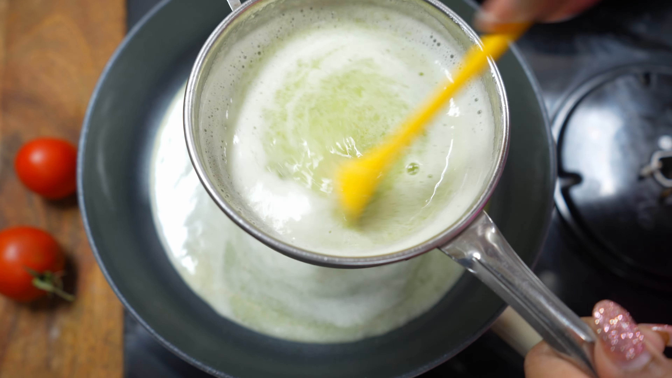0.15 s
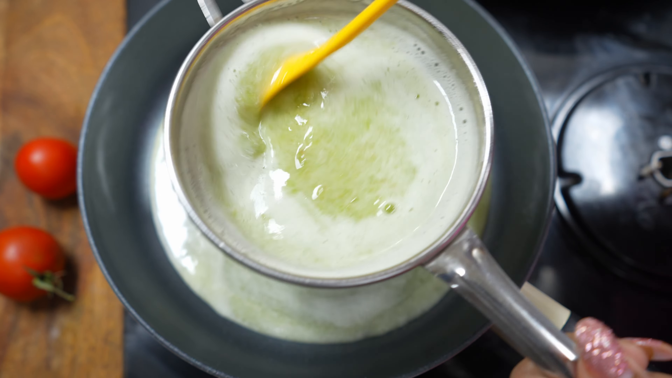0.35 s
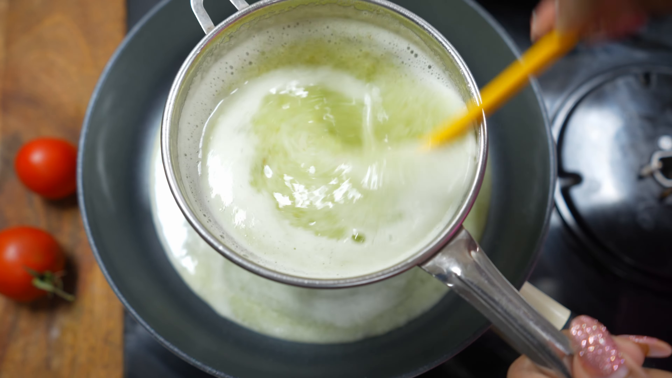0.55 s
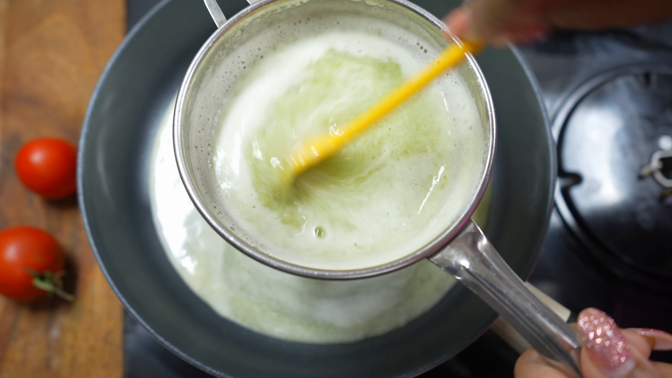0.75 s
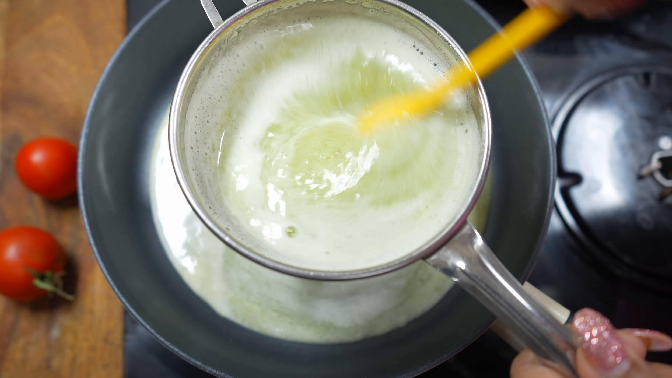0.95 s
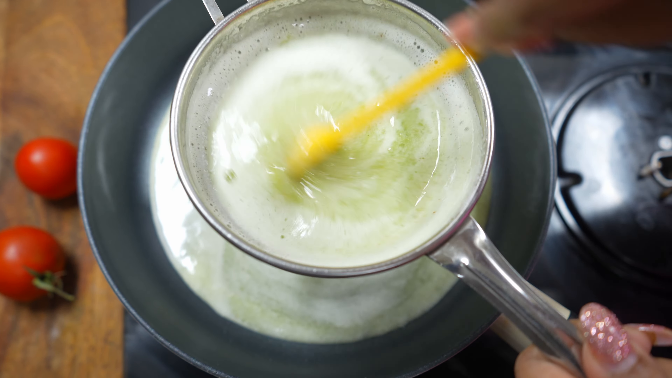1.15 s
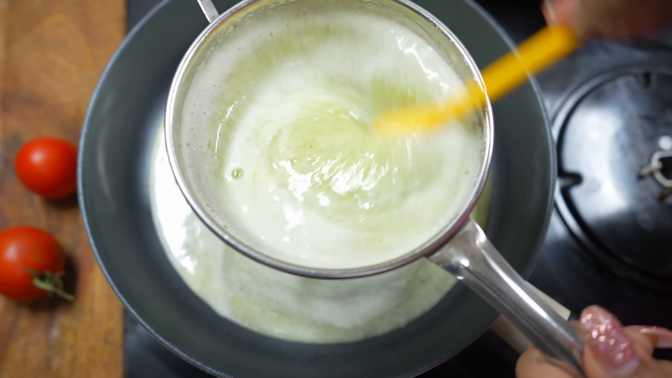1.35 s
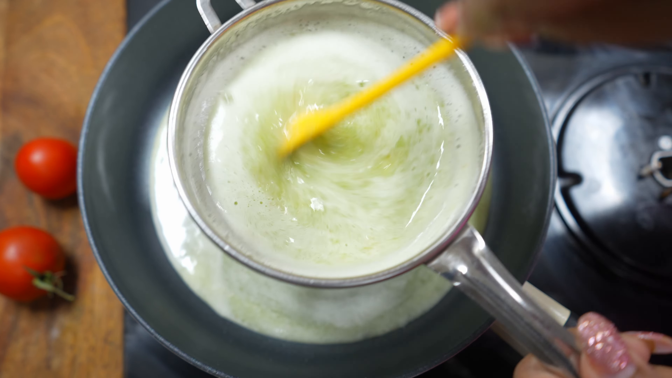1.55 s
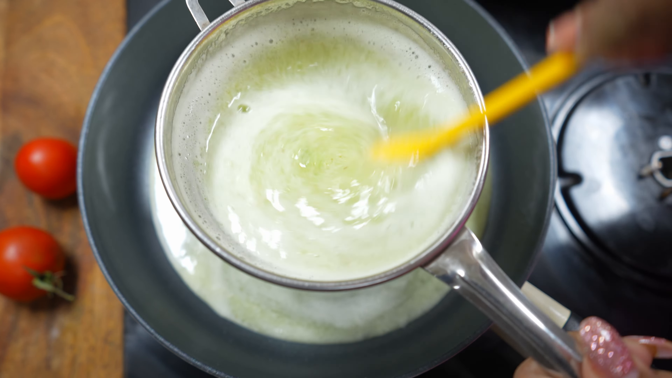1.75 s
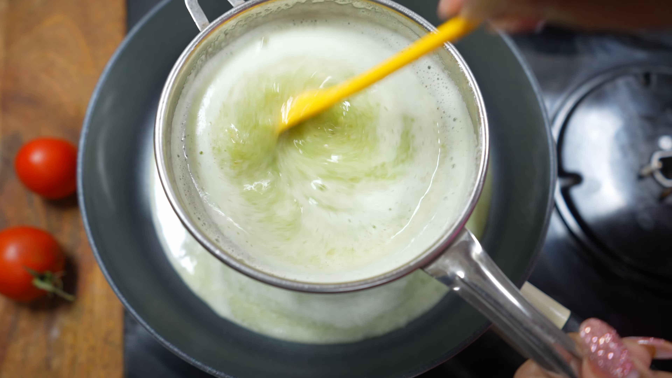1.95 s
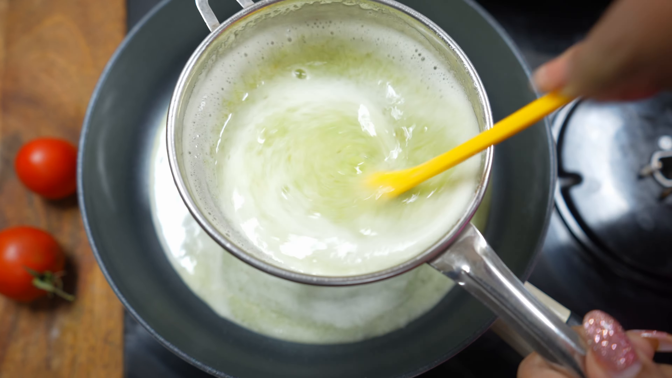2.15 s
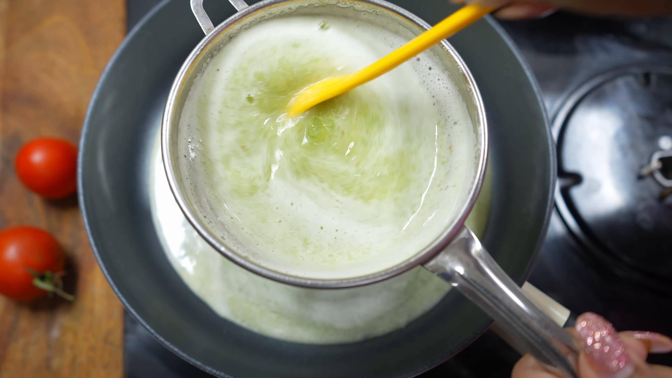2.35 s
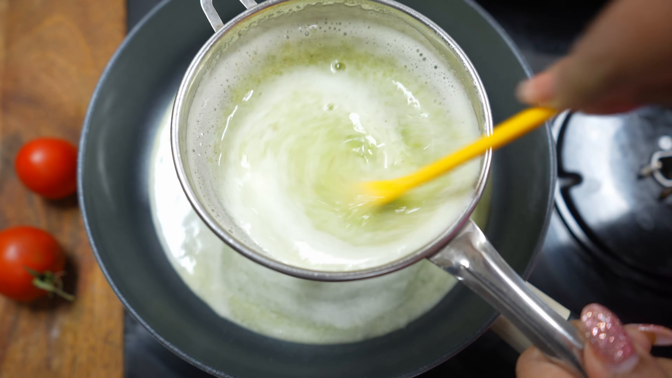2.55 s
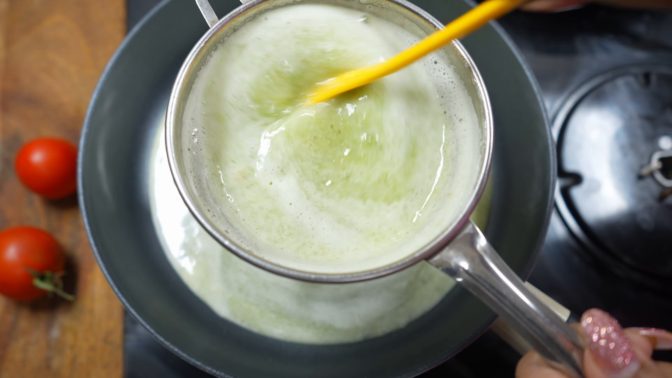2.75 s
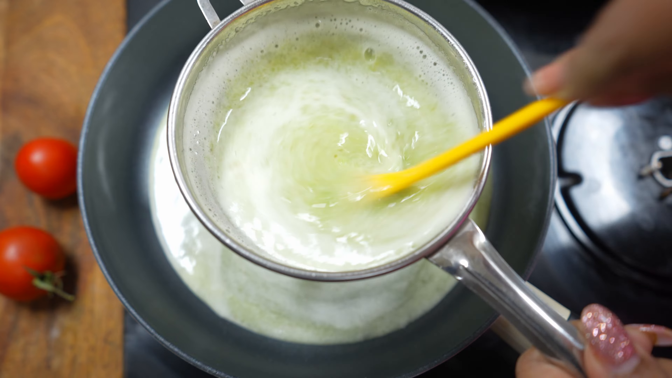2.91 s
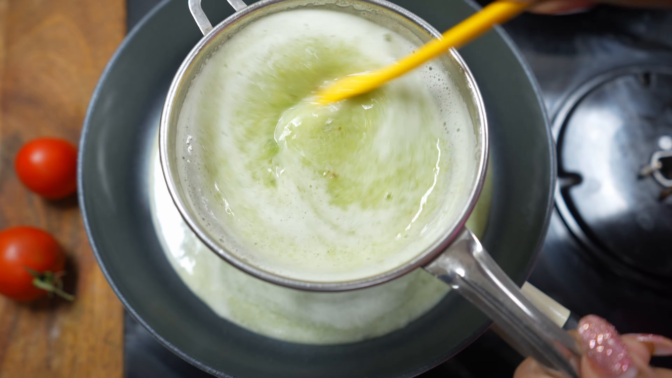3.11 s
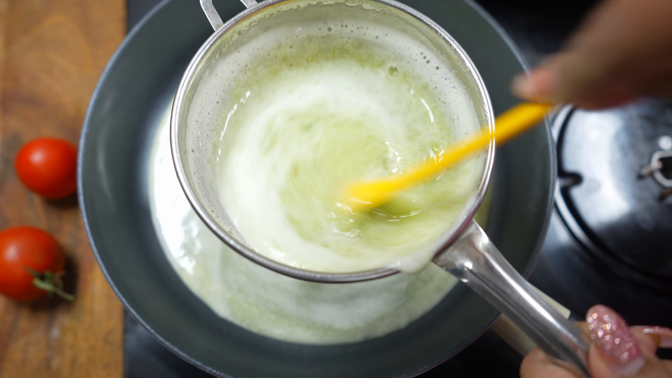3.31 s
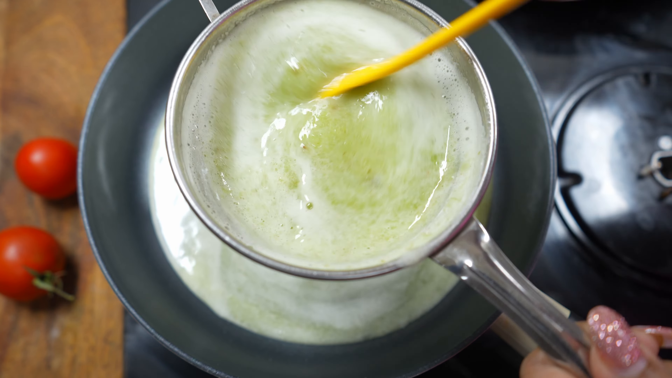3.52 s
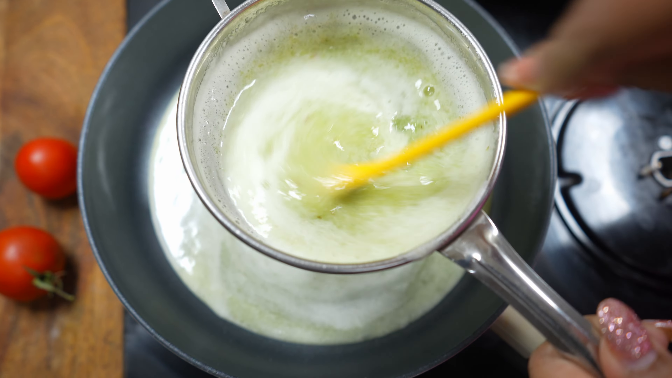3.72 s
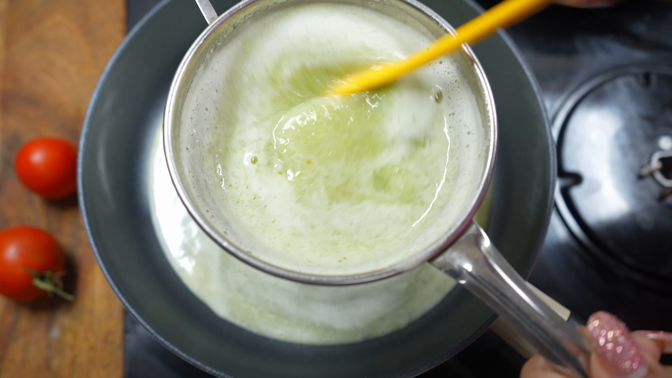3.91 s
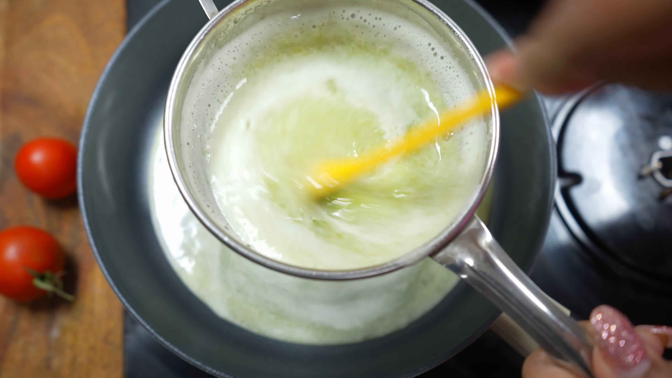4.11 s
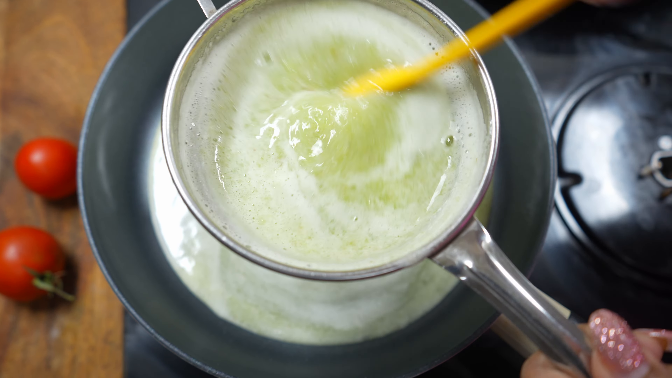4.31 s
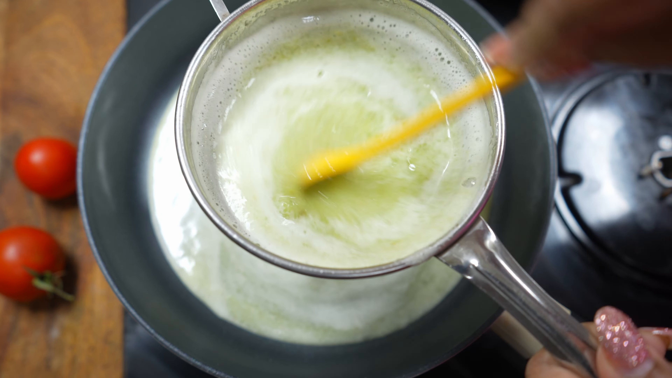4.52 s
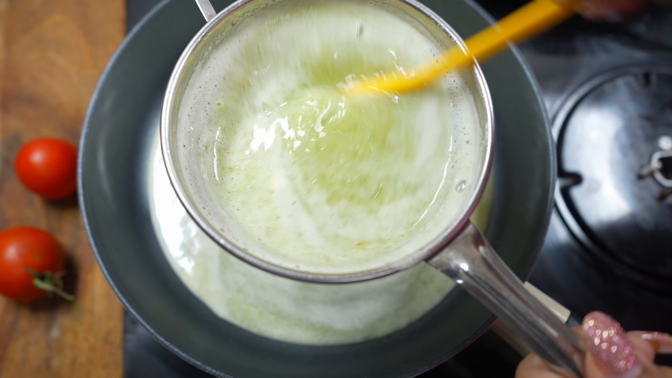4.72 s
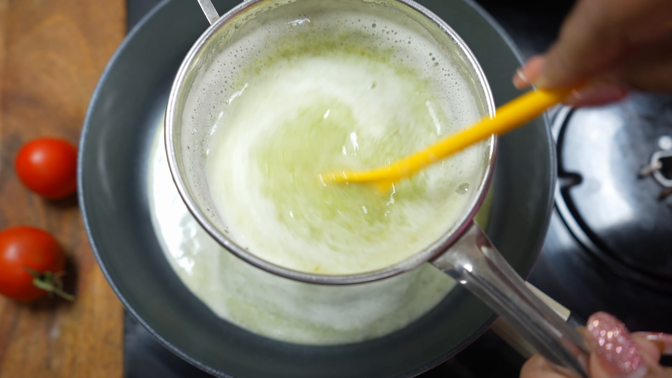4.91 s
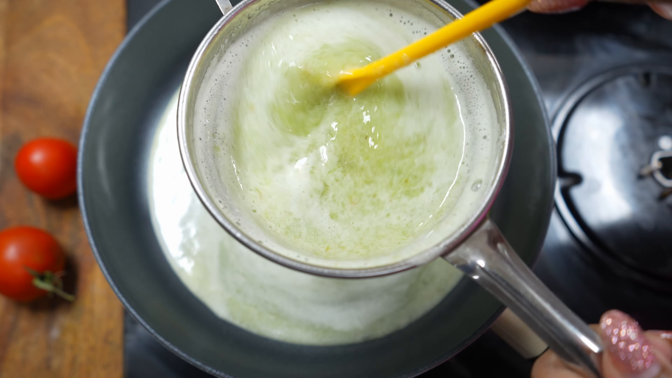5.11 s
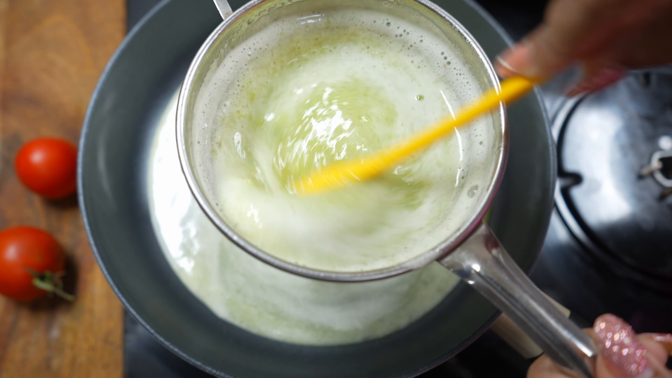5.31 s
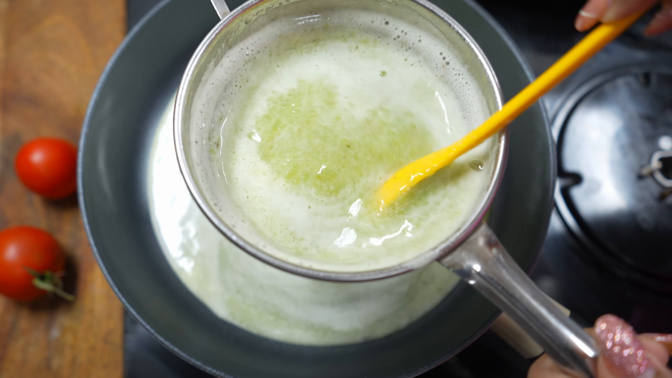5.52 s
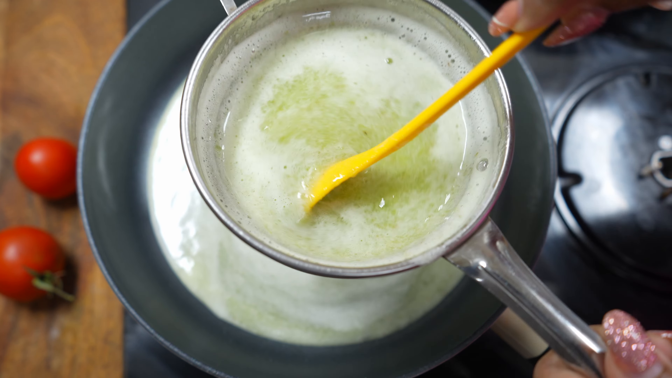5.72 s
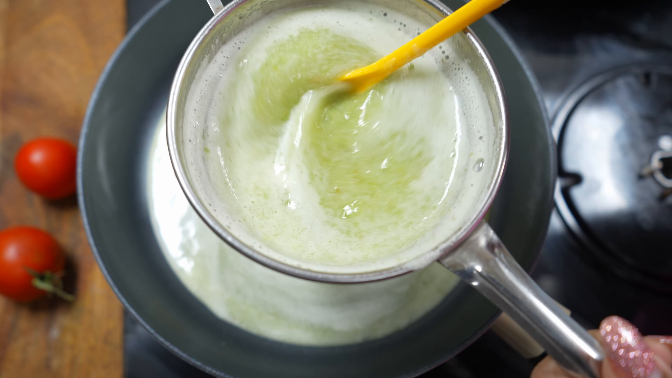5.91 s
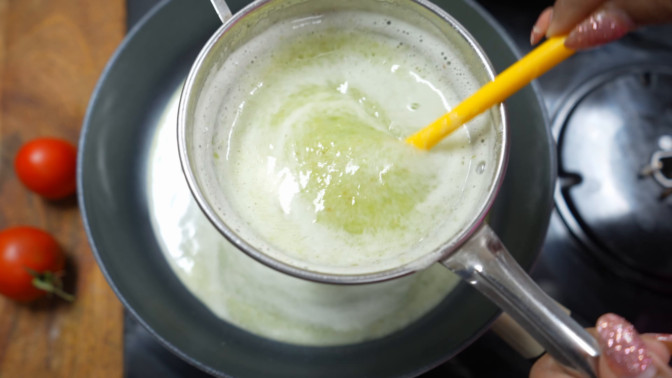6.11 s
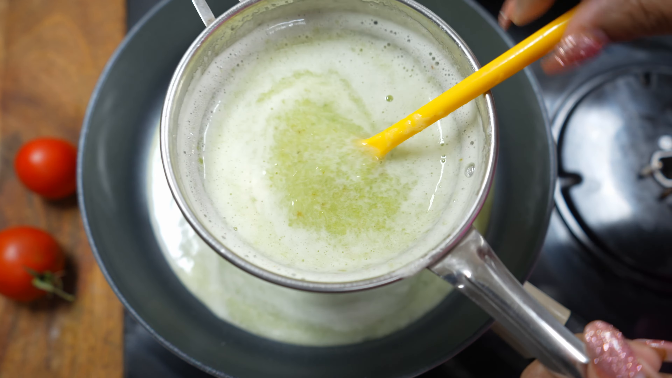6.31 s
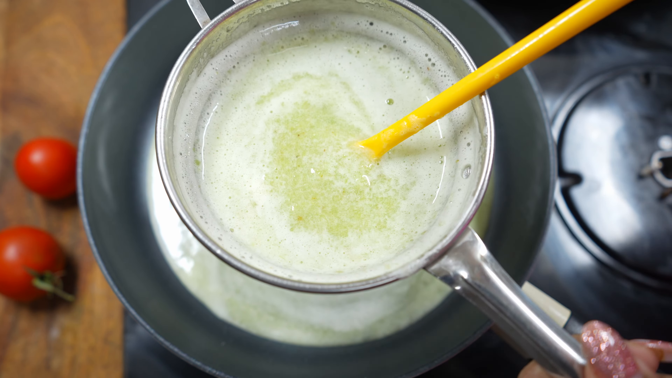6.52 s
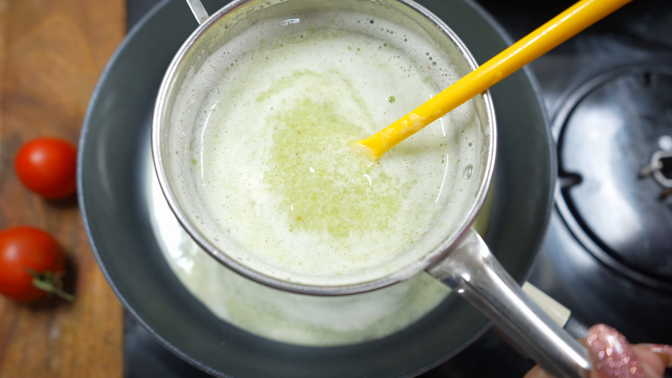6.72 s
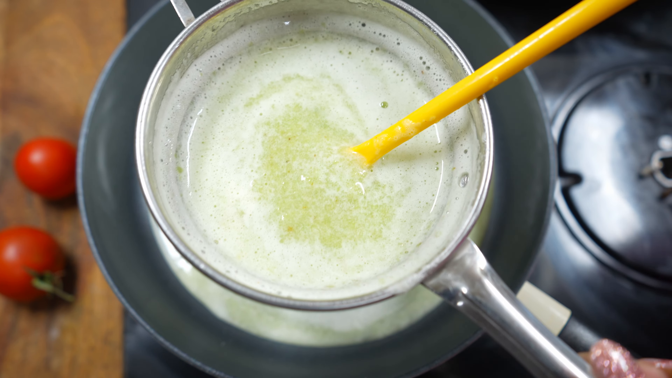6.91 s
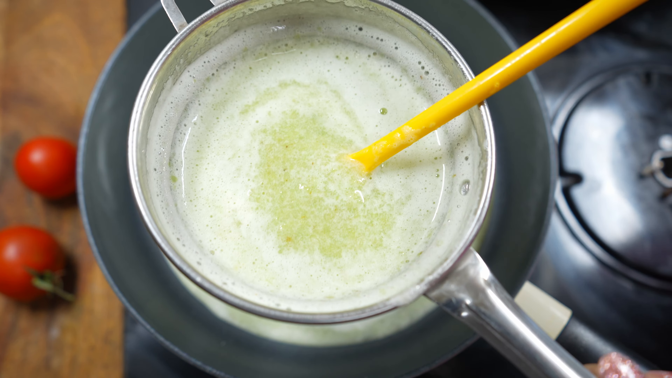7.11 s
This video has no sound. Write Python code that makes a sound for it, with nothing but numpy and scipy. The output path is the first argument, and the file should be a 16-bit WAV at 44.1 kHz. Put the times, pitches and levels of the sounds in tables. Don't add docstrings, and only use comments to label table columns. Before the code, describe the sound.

Close wet scraping swirls round a wire sieve with steel ticks and hollow bowl resonance, ending in a clack, soft shifting and small plinks.

```python
import sys
import numpy as np
from scipy import signal
from scipy.io import wavfile
from scipy.ndimage import uniform_filter1d, minimum_filter1d

SR = 44100
rng = np.random.default_rng(int(sys.argv[2]) if len(sys.argv) > 2 else 0)


def wav_out(sig):
    wavfile.write(sys.argv[1], SR, np.round(np.clip(np.atleast_2d(sig).T, -1, 1) * 32767).astype(np.int16))


def makeup_ratio(level_db):
    decades = np.asarray(level_db, float) / 20
    return 10 ** decades


N = 319900
T = np.arange(N) / SR

RIM_HZ = [830, 1087, 1870, 2132, 2340, 2552, 2760, 2980, 3280, 3950, 4240, 4600, 4810, 5400, 5700, 6380,
          6870, 7080, 7270, 8630]


def evened(x):
    return x / np.sqrt(np.mean(x ** 2) + 1e-20)


def read(points, hz):
    point_hz, value = np.transpose(points)
    return np.interp(np.log(hz + 1), np.log(point_hz + 1), value)


def wander(rate_hz):
    knots = uniform_filter1d(rng.standard_normal(2000), size=3)
    knots = knots - uniform_filter1d(knots, size=15)
    return np.interp(T * rate_hz * 3, np.arange(2000), evened(knots))


def ring(x, hz, width_hz):
    r = np.exp(-np.pi * width_hz / SR)
    angle = 2 * np.pi * hz / SR
    return signal.lfilter([1 - r * r], [1, -2 * r * np.cos(angle), r * r], x) * np.sin(angle)


def colour(x, points):
    gain_db = read(points, abs(np.fft.fftfreq(4096, 1 / SR)))
    log_gain = np.log(makeup_ratio(np.maximum(gain_db, -90)))
    taps = np.fft.ifft(np.exp(np.conj(signal.hilbert(log_gain)))).real[:2048]
    return signal.oaconvolve(x, taps)[:N]


def slips(per_s, spread_db, clump_db, clump_hz):
    size = makeup_ratio(spread_db * np.minimum(rng.exponential(1, N), 4)) * rng.choice([-1., 1.], N)
    happens = rng.random(N) < per_s / SR
    return evened(size * happens * makeup_ratio(clump_db * wander(clump_hz)))


def stroke(start_s, length_s, fall_db_per_s):
    rise_s, arch_db, crest = 0.015, 4.5, 0.51
    u = (T - start_s) / length_s
    shape_db = -arch_db * ((np.clip(u, 0, 1) - crest) * 2) ** 2
    fall_db = fall_db_per_s * np.maximum(u - 1, 0) * length_s
    return np.clip((T - start_s) / rise_s, 0, 1) ** 2 * makeup_ratio(shape_db - fall_db)


def push():
    # start_s, length_s, push_db, shallow_bowl_relative_db, wires_relative_db
    circles = [(0.704, 0.1, -20, 2, -24), (0.819, 0.15, -19, -3, -15.5), (0.917, 0.14, -14, -20.5, -23.5),
               (1.066, 0.26, -16.5, -2, -17.5), (1.352, 0.069, -13, -21, -20.5),
               (1.456, 0.14, -14.5, -1, -18), (1.69, 0.18, -13.5, -15, -22), (1.856, 0.11, -10, -2, -21.5),
               (1.997, 0.17, -16, -19.5, -23), (2.103, 0.15, -17, -3, -19.5),
               (2.25, 0.078, -12.5, 1.5, -17.5), (2.415, .12, -12, -14, -27), (2.589, .12, -13.5, 0.5, -19),
               (2.783, 0.17, -12, -4.5, -18), (2.981, 0.12, -17, 4, -14), (3.149, 0.051, -12.5, -3, -16),
               (3.279, 0.23, -20, 3, -11), (3.568, 0.15, -12.5, -7, -17.5), (3.713, .26, -19.5, 1, -15),
               (4.031, 0.1, -19, -20.5, -12), (4.09, 0.19, -17.5, 2, -16.5),
               (4.333, 0.14, -13.5, -5, -14.5), (4.485, 0.17, -18.5, 2, -13)]
    # start_s, length_s, push_db, shallow_bowl_relative_db, wires_relative_db
    swipes = [(-.04, 0.07, -14.5, -3, -20), (0.152, 0.07, -20.5, 6.5, -5.5), (.26, 0.096, -23, 1, -6),
              (0.389, 0.078, -35.5, -23, 1), (.525, 0.059, -9.5, -5, -15.5), (4.744, 0.12, -12.5, -4, -14),
              (4.98, 0.11, -26.5, 7.5, -38), (5.264, 0.046, -22, 3, -7.5), (5.308, 0.1, -12.5, -9, -22),
              (5.583, 0.12, -22, -1, -13.5), (5.631, 0.058, -17, 3, -15.5), (5.84, 0.023, -41, 2, -16),
              (5.918, 0.048, -52.5, 0, 24), (5.43, 0.034, -38, -9, 4.5), (6.05, 0.039, -31.5, -3, -3.5),
              (6.09, 0.026, -26.5, 9.5, -15)]
    # start_s, length_s
    contact_s = (.22, 4.53)
    # push_db, shallow_bowl_relative_db, wires_relative_db
    contact_db = (-27, 2.5, -9.5)
    wire_rise_s = 0.036
    wire_exponent = 0.84
    strokes = circles + swipes + [tuple(contact_s) + tuple(contact_db)]
    falls_db_per_s = [288] * len(circles) + [249] * (len(swipes) + 1)
    power = np.full((3, N), 1e-10)
    for (start_s, length_s, push_db, shallow_db, wire_db), fall in zip(strokes, falls_db_per_s):
        shape = stroke(start_s, length_s, fall) ** np.array([[1], [1], [wire_exponent]])
        shape[2] *= np.clip((T - start_s) / wire_rise_s, .15, 1)
        part_db = push_db + np.array([[0], [shallow_db], [wire_db]])
        power += (makeup_ratio(part_db) * shape) ** 2
    return 10 * np.log10(power)


def jolts():
    # start_s, peak_db, shallow_modes_relative_db
    catches = [(0.123, -5, -10), (0.15, 3.5, -3), (0.161, -3, 4.5), (0.276, -19, 20), (0.538, 2, -25),
               (0.754, -4, -7), (1.015, 0, -16), (1.091, -1, 1), (1.371, -4, -6.5), (1.461, 1.5, -23),
               (1.708, -5.5, -11), (4.961, -9, 9), (2.113, 4, -17), (5.232, -14.5, -3), (2.626, -9, -10),
               (3.313, -28, 8), (3.358, 3, -16), (3.587, 0, 1.5), (4.006, -7, -37), (4.05, 5.5, 0.5),
               (4.398, -23, -12), (4.773, 3, -13), (4.991, -14, 20.5), (5.078, -17, -4), (5.253, -14.5, -7),
               (5.59, -11, -7), (5.851, -28, -3), (5.936, -25.5, 25.5), (6.049, -10, 2.5),
               (6.098, -11, 6.5)]
    out, t = np.zeros((2, N + SR)), np.arange(SR // 4) / SR
    shape = np.exp(-t / 0.02) * np.minimum(t / 0.0018, 1)
    for start_s, peak_db, shallow_db in catches:
        both_db = [[peak_db - 17.5], [peak_db + shallow_db - 19.5]]
        out[:, round(start_s * SR):][:, :len(t)] += makeup_ratio(both_db) * shape
    return out[:, :N]


def pops():
    t = np.arange(SR // 50) / SR
    burst = rng.standard_normal(len(t)) * np.exp(-t / .002)
    bursts = slips(per_s=35, spread_db=3, clump_db=0, clump_hz=9)
    return evened(signal.oaconvolve(bursts, burst)[:N])


def bowl(drive, level, modes_hz, modes, place_db):
    touched = [drive * makeup_ratio(db + place_db * wander(10)) for _, db in modes]
    steady = sum(ring(x, hz, width) for x, hz, (width, _) in zip(touched, modes_hz, modes))
    played = sum(ring(x * level, hz, width) for x, hz, (width, _) in zip(touched, modes_hz, modes))
    return played / np.sqrt(np.mean(steady ** 2))


def stirring(deep_db, shallow_db, rasp_db):
    deep_hz = [165, 277, 350, 415, 445, 509, 563, 600, 662, 700]
    # width_hz, level_db
    deep_modes = [(40, -1), (20, 9.5), (23.148, 9), (32, 6.5), (25, 8), (21.8, 8.5), (25, 14), (30, 2.5),
                  (29.2, 9.5), (26.3, 5.5)]
    shallow_hz = [758, 832, 902, 961, 1032, 1070, 1165, 1287, 1379, 1440, 1604]
    # width_hz, level_db
    shallow_modes = [(19, -6), (24.074, -3.5), (23.76, -9.5), (23.148, -3), (26.2, 5), (25.6, -11),
                     (32.407, -5), (27.6, -3), (22.4, -9), (32.4, -66), (19.8, -50)]
    # frequency_hz, level_db
    rasp_colour = [(700, -23.5), (1100, 6.5), (1500, -13), (2000, -3), (3000, -2.5), (4800, -5.5),
                   (5300, -16), (7500, -22), (11000, -72)]
    # frequency_hz, level_db
    fizz_colour = [(3500, -23), (5200, -2), (6800, -3.5), (7600, -9.5), (9500, -13.5), (12000, -17),
                   (14300, -18), (16000, -43)]
    fizz_db = -47.5 + 1.0 * (rasp_db + 32.5)
    moving = np.clip((6.3 - T) / 0.027, 0, 1)
    deep_jolt, shallow_jolt = jolts()
    heavy = slips(per_s=2000, spread_db=2.5, clump_db=1.0, clump_hz=34.43) * moving
    light = slips(per_s=9000, spread_db=5.0, clump_db=1.5, clump_hz=49.95) * moving
    finest = slips(per_s=12000, spread_db=3.5, clump_db=1.1, clump_hz=45) * moving
    patches = sum(ring(finest * makeup_ratio(4 * wander(12)), hz, hz / 7) for hz in np.geomspace(5500, 14000, 8))
    finest = evened(finest + 1.6 * evened(patches))
    light = light * (0.11 + 0.75 * np.sqrt(abs(uniform_filter1d(heavy ** 2, size=400))))
    blooms = evened(sum(ring(light * makeup_ratio(5.5 * wander(11)), hz, hz / 16) for hz in RIM_HZ[2:17]))
    snaps = .6 * pops() * moving
    finest = finest + snaps
    wires = evened(colour(evened(light) + 1.5 * blooms + 1.5 * snaps, rasp_colour))
    fizz = evened(colour(finest + 0.092 * light, fizz_colour))
    out = bowl(heavy, makeup_ratio(deep_db - 3.0) + deep_jolt, deep_hz, deep_modes, place_db=3.0)
    out += bowl(heavy, makeup_ratio(shallow_db - 2.5) + shallow_jolt, shallow_hz, shallow_modes, place_db=4.0)
    out += (makeup_ratio(rasp_db + 2.0) + 0.2 * shallow_jolt) * wires
    return out + (makeup_ratio(fizz_db + 3.5) + 0.013 * shallow_jolt) * fizz


def rumble(push_db):
    # frequency_hz, level_db
    rumble_colour = [(20, -19.5), (60, -17), (110, -18), (170, 2.5), (260, -36.5), (500, -82)]
    level_db = -45.5 + 0.45 * np.maximum(push_db, -62)
    return makeup_ratio(level_db) * evened(colour(rng.standard_normal(N), rumble_colour))


def hush():
    # frequency_hz, level_db_per_hz
    hush_colour = [(15, -57), (25, -41), (82, -2.5), (283, 0), (448, 5.5), (789, -5), (1180, -6),
                   (3040, -14), (3770, -10.5), (4200, -16.5), (15700, -29)]
    return makeup_ratio(-51 + 1.0 * wander(36)) * evened(colour(rng.standard_normal(N), hush_colour))


def touch(force, low_db, upper_db, top_db, ringing):
    # t60_s, level_db
    rim_modes = [(.1, -2), (.12, 0), (.05, 0), (.05, -3), (.05, -2), (.06, -1), (.04, 0), (.06, 2),
                 (.045, -2), (.05, 1), (.045, 0), (.05, 3), (.06, 2), (.04, -3), (.06, 1), (.05, -5),
                 (.09, 3), (.05, 0), (.07, 1), (.04, -10)]
    borders_hz = [2200, 3600, 6000]
    damped = .5
    force = np.convolve(force, [.25, .5, .25])[:-2]
    family = np.searchsorted(borders_hz, RIM_HZ)
    part_db = np.array([low_db, 0, upper_db, top_db])[family]
    part_db = part_db + 1.1 * rng.standard_normal(len(RIM_HZ))
    rings = 0
    for hz, (t60_s, db), gain_db in zip(RIM_HZ, rim_modes, part_db):
        width_hz = 2.2 / t60_s / (ringing if hz > 5500 else damped)
        rings = rings + makeup_ratio(gain_db + db) * t60_s * ring(force, hz, width_hz)
    ranges = [(1000, 2200, low_db), (2200, 3600, 0), (3600, 5200, upper_db),
              (5200, 7600, top_db - 8), (7600, 15000, top_db - 19)]
    crack = 0
    for low_hz, high_hz, db in ranges:
        band = signal.butter(2, [low_hz, high_hz], "band", fs=SR, output="sos")
        crack = crack + makeup_ratio(db) * signal.sosfilt(band, force)
    return rings / abs(rings).max() + .9 * crack / abs(crack).max()


def rim():
    # start_s, peak_db, upper_modes_relative_db, highest_modes_relative_db
    ticks = [(0.281, -16, -19, -13), (0.463, -9.5, -41, -40), (1.926, -22, 8, -20), (2.1143, -20, 5, -13),
             (2.4951, -18, -3, -26), (2.6124, -22, -4, -17), (3.2066, -5, -8.5, -14),
             (3.309, -12.5, -9, -16), (3.315, -14, 3, -13), (3.7403, -15.5, -3, -3),
             (3.9976, -8, -6.5, -7.5), (4.0508, -19.5, 3, -21), (4.115, -19.5, 0, 2),
             (4.592, -22, -15, -23), (4.752, -11, -0.5, -11), (4.7682, -10.5, -16, -2),
             (4.927, -25.5, -3, -3), (4.99, -31, -22, -24), (5.108, -38, -6, -11), (5.252, -31, -14, -19),
             (5.351, -14.5, -4, -11), (5.4361, -11.5, -3, -8), (5.82, -33, -6, -6), (5.9379, -6.5, -1, 3),
             (6.106, -24, -4.5, 2), (6.1922, -31.5, -1, 0), (6.5534, -31.5, -4, -11)]
    # start_s, peak_db, upper_modes_relative_db, highest_modes_relative_db, length_s
    grates = [(0.1637, -20.5, -19, -9, 0.049), (0.1936, -24, -17, -24, .026),
              (0.5054, -10, -3.5, -13.5, 0.045), (0.5695, -38, -9, -15, 0.04),
              (2.2778, -40.5, 3, -22, 0.031), (2.6388, -27, -13, -23, .04), (3.2076, -9.5, -8, -6, 0.031),
              (4.785, -9, -4.5, -7, 0.021), (5.312, -20.5, -9, -11, 0.0414), (5.65, -28, -23, -10, 0.04),
              (5.85, -29, -19, -19, 0.04)]
    out, t = np.zeros(N + SR), np.arange(SR // 4) / SR
    for start_s, peak_db, upper_db, top_db, *grate in ticks + grates:
        hold_s, low_db = (grate[0], -14.5) if grate else (0.0022, -6)
        force = rng.standard_normal(len(t)) * 0.51 / (1 + (t / hold_s) ** 4)
        if grate:
            force *= np.minimum(t / (0.43 * hold_s), 1)
        else:
            force[0] = 1.5
        ringing = 2.0 if start_s > 5.9 else .5
        sound = touch(force, low_db, upper_db, top_db, ringing)
        out[round(start_s * SR):][:len(t)] += makeup_ratio(peak_db + 1.0) * sound
    return out[:N]


def shifting():
    # start_s, length_s, level_db, start_centre_hz, end_centre_hz
    drags = [
        (6.498, 0.14, -40.5, 325, 277),
        (6.733, 0.16, -45.5, 514, 750),
        (7.2, .06, -53, 370, 420),
    ]
    start_s, length_s, level_db, from_hz, to_hz = np.transpose(drags)
    level = sum(makeup_ratio(db) * stroke(s, d, 170) for s, d, db in zip(start_s, length_s, level_db))
    hz = np.interp(T, np.c_[start_s, start_s + length_s].ravel(), np.c_[from_hz, to_hz].ravel())
    bright_db = np.minimum(-9 + 25.5 * np.log2(hz / 400), 4)
    drive = slips(per_s=1200, spread_db=3.0, clump_db=1.5, clump_hz=39.3)
    turning, r = np.exp(2j * np.pi * np.cumsum(hz) / SR), np.exp(-np.pi * 260 / SR)
    smooth = signal.lfilter([1 - r], [1, -r], drive / turning)
    smooth = signal.lfilter([1 - r], [1, -r], smooth)
    low = evened((turning * smooth).real)
    high = evened(ring(drive, 1200, 300) + ring(drive, 1700, 500) + 0.26 * ring(drive, 2360, 900))
    shifted = level * (low + makeup_ratio(bright_db) * high)
    return signal.sosfilt(signal.butter(2, 140, "high", fs=SR, output="sos"), shifted)


def drops():
    # start_s, peak_db, pitch_hz, t60_s
    falls = [
        (6.4998, -34, 1975, 0.072),
        (6.5535, -39.5, 1230, 0.08),
        (6.746, -31.5, 1217, 0.08),
        (6.772, -34, 1250, 0.087),
        (7.187, -42, 1170, 0.08),
        (7.2424, -45, 1230, 0.08),
    ]
    out, t = np.zeros(N + SR), np.arange(SR // 4) / SR
    for start_s, peak_db, hz, t60_s in falls:
        tone = np.sin(2 * np.pi * hz * t) + 0.83 * np.sin(2 * np.pi * hz * 1.045 * t)
        plink = makeup_ratio(peak_db + 1.5 - 60 * t / t60_s) * tone * np.minimum(t / 0.0017, 1)
        out[round(start_s * SR):][:len(t)] += plink
    return out[:N]


def kitchen(x):
    # frequency_hz, t60_s
    room_decay = [(200, 0.14), (1000, 0.12), (4000, 0.19), (12000, 0.16)]
    taps = np.zeros(SR // 2)
    at = np.arange(200, len(taps) - 20, 20)
    taps[at + rng.integers(0, 20, len(at))] = rng.choice([-1., 1.], len(at))
    hz, t, z = signal.stft(taps, SR, nperseg=256)
    decay = makeup_ratio(-60 * t / read(room_decay, hz)[:, None])
    tail = signal.istft(z * decay, SR, nperseg=256)[1]
    return signal.oaconvolve(x, tail / np.linalg.norm(tail))[:N]


def scene():
    # frequency_hz, level_db
    radiates = [(30, -83.5), (100, -30), (200, -21), (300, -8.5), (400, 2.5), (16000, -7)]
    levels_db = push()
    near = colour(stirring(*levels_db) + rim() + drops(), radiates)
    near = near + shifting() + rumble(levels_db[0])
    return (near + makeup_ratio(-9.5) * kitchen(near) + hush())[None]


def low_pass(x):
    return signal.sosfilt(signal.butter(12, 15890, fs=SR, output="sos"), x)


def record(dry):
    room_left = minimum_filter1d(np.minimum(0.96 / (abs(dry) + 1e-9), 1), size=441)
    mix = dry * uniform_filter1d(room_left, size=441)
    return low_pass(mix)


dry = scene()
out = record(dry)
wav_out(out)
```